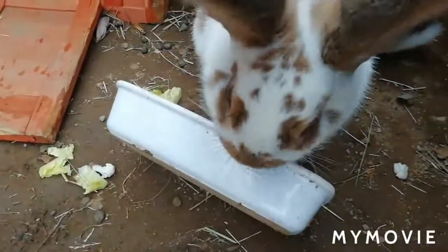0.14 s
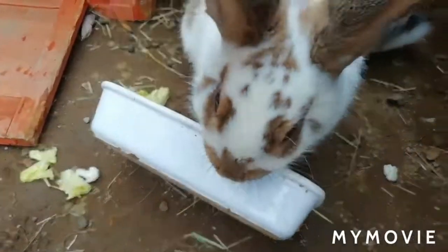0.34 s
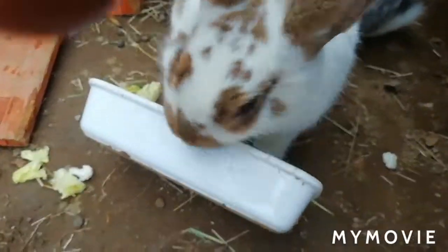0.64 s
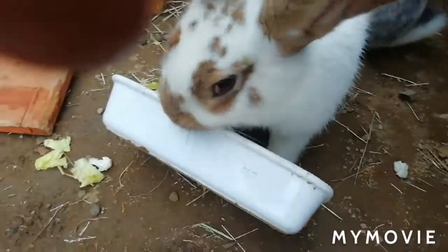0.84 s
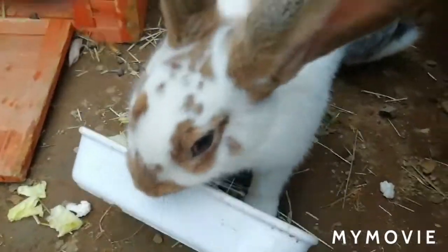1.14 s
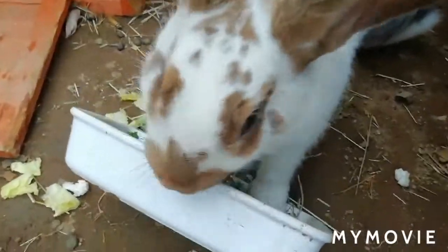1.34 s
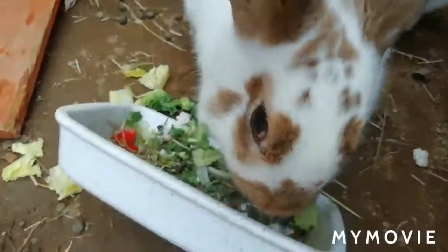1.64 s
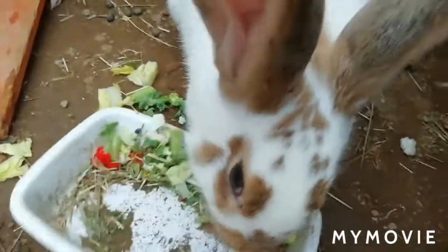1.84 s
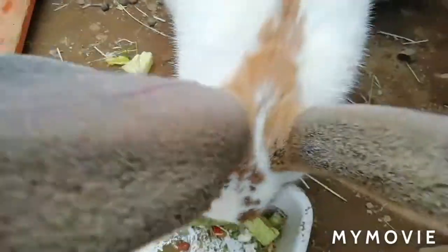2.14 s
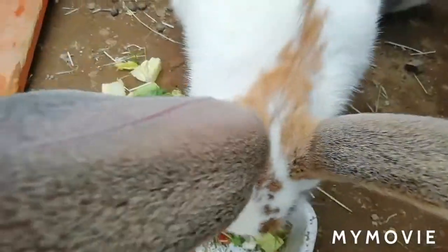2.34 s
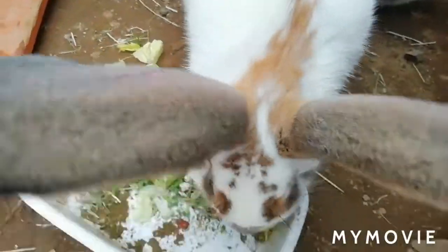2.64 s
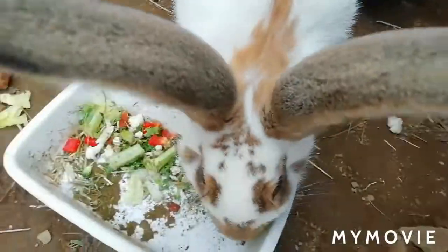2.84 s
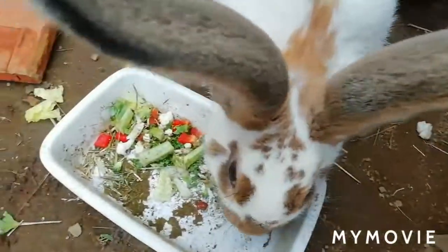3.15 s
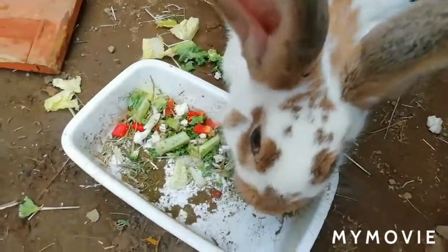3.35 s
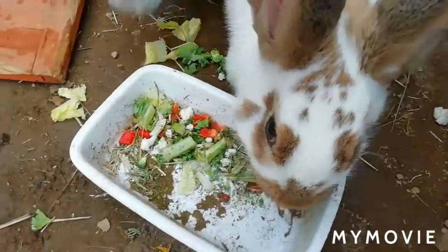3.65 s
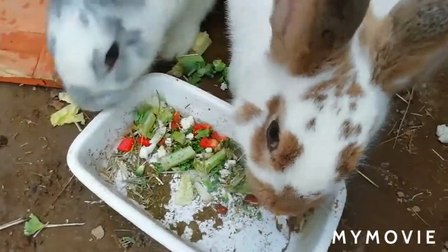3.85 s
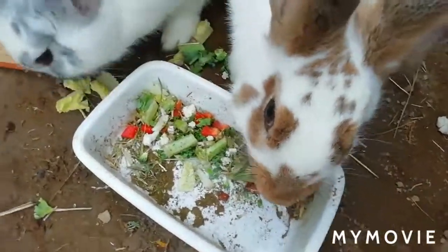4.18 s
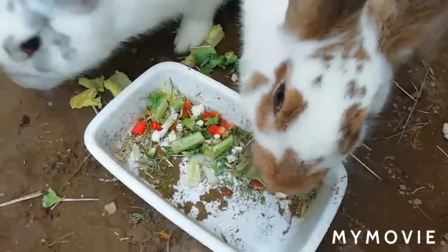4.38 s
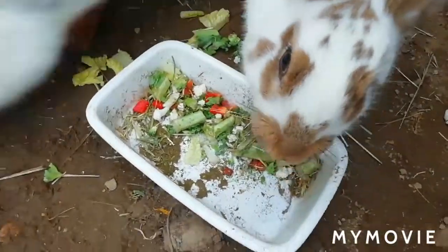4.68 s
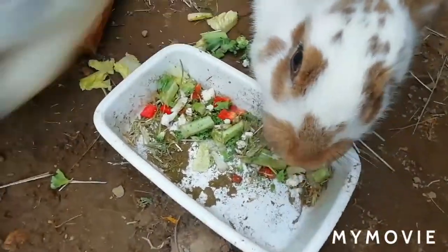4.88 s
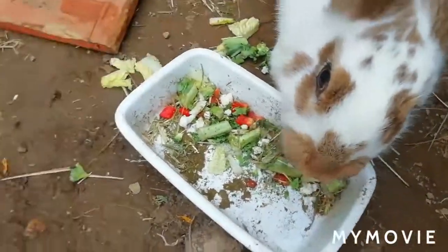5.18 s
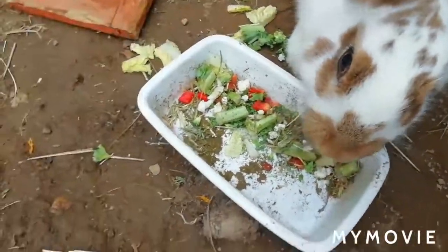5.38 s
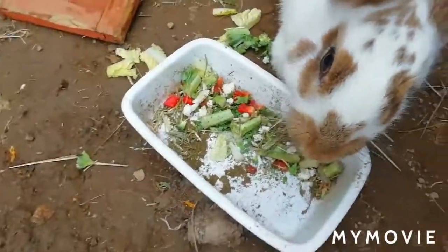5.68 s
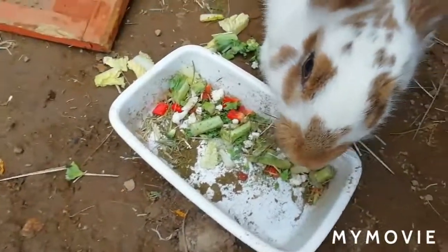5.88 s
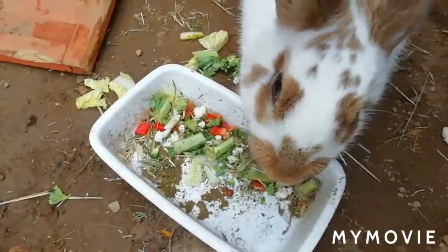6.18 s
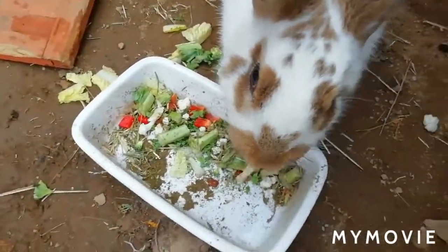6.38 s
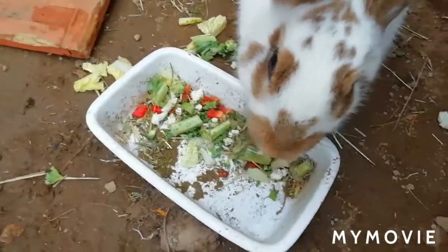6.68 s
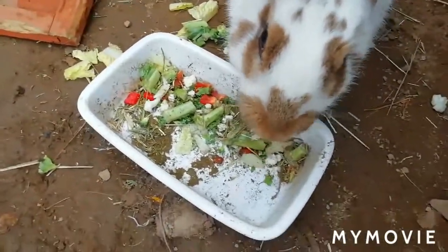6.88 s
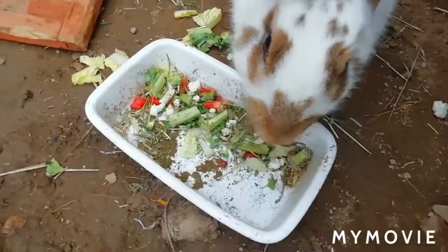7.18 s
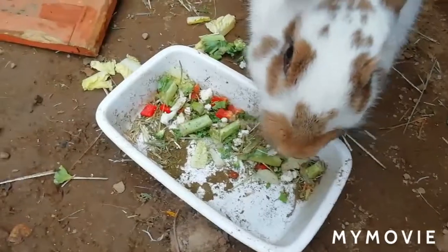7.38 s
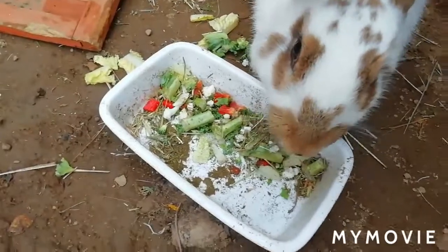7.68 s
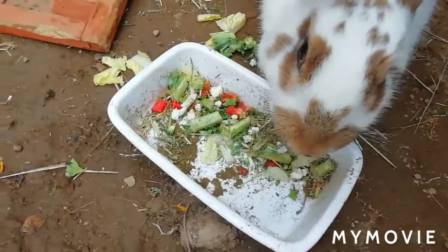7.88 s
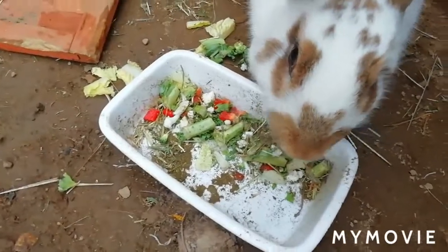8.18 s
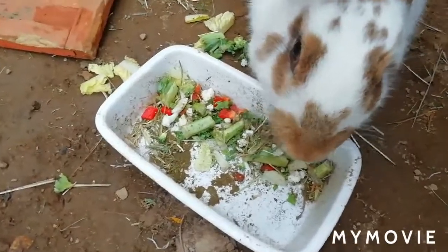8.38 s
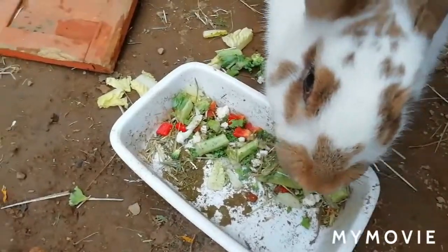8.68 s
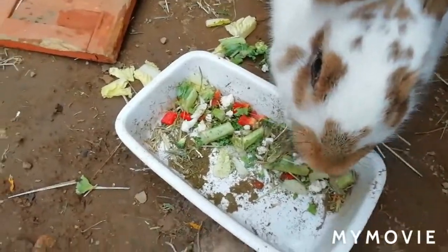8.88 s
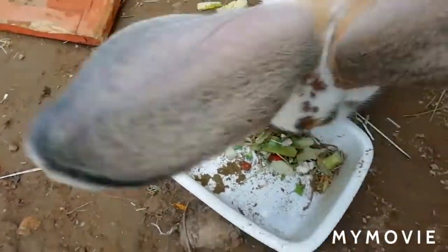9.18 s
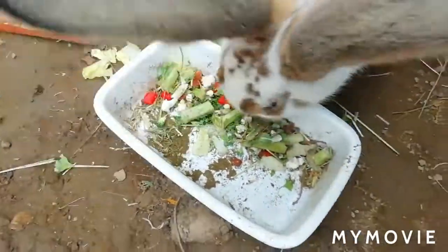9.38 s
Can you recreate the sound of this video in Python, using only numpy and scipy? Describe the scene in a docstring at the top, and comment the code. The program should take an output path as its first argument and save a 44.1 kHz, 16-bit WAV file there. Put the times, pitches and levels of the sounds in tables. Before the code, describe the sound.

A rabbit noses a ceramic dish, making a few light clinks among small crunches. At about two seconds the dish lands on soil with a soft double thud. The rabbit then eats vegetables and hay in short, crisp, irregular bursts, with sharp little snaps and a few soft knocks. The sounds are quiet and close, outdoors, with faint distant traffic and hiss behind them.

```python
"""Distant traffic and a faint hiss sound throughout. A rabbit noses a ceramic dish on bare soil, and its
touches excite the dish's modes in clinks. At two seconds the dish tips upright and lands with two thuds.
The rabbit eats from it: cells fracture in bursts of dense crunching, stalk and straw break in single
snaps, and jaw and dish knock softly. Near the end, faint fuzzy tones sound for a second."""
import sys
import numpy as np
from scipy import signal
from scipy.fft import rfft, irfft, next_fast_len
from scipy.io import wavfile
from scipy.ndimage import uniform_filter1d, map_coordinates

SR = 44100
rng = np.random.default_rng(int(sys.argv[2]) if len(sys.argv) > 2 else 0)


def generate_wav(sig):
    """Save sig (samples, or channels by samples) to the path in sys.argv[1] as 16-bit PCM at SR."""
    pcm = np.round(np.clip(np.atleast_2d(sig).T, -1, 1) * 32767).astype(np.int16)
    wavfile.write(sys.argv[1], SR, pcm)


N = 420273

# the head moves against ground and dish: time_s, notch_hz, hollow_db
HEAD_PATH = [(.6, 3970, 10), (2.37, 3910, 3), (3.42, 4030, 7), (4.16, 4060, -2), (4.75, 3990, 4.5),
             (5.16, 4000, -7), (5.4, 4060, 2.5), (7.23, 4050, 2.5), (7.68, 4000, 0), (8.6, 3900, -1.5),
             (8.98, 4040, -7), (9.43, 4100, -4)]


def amp(db):
    return 10 ** (np.asarray(db) / 20)


def unit(x):
    return x / np.sqrt(np.mean(x ** 2) + 1e-20)


def curves(rows):
    """Linear interpolation: one value per sample for each column after the time."""
    times, *columns = np.transpose(rows)
    return [np.interp(np.arange(N) / SR, times, column) for column in columns]


def wobble(rate_hz):
    """Smooth random modulation: a spline through Gaussian knots."""
    knots = rng.standard_normal(int(N * rate_hz / SR) + 4)
    return map_coordinates(knots, [np.arange(N) * rate_hz / SR])


def filtered(x, response):
    """Linear filtering: the spectrum times a frequency response."""
    size = next_fast_len(N + SR // 2)
    return irfft(rfft(x, size) * response(np.fft.rfftfreq(size, 1 / SR)), size)[:N]


def coloured(x, spectrum):
    """Spectral shaping on a log frequency axis, scaled to rms 1."""
    knots_hz, gain_db = np.transpose(spectrum)
    return unit(filtered(x, lambda hz: amp(np.interp(np.log(hz + 1), np.log(knots_hz + 1), gain_db))))


def patchy(x, depth_db):
    """Spectral modulation: random colour that changes every few hundredths of a second."""
    spectra = signal.stft(x, nperseg=256)[2]
    field = uniform_filter1d(rng.standard_normal(spectra.shape), size=5, axis=0)
    field = uniform_filter1d(field, size=6, axis=1)
    return signal.istft(spectra * amp(depth_db * unit(field)), nperseg=256)[1][:N]


def damped(t, level_db, pitch_hz, t60_s):
    """Free vibration of one mode: a sine that decays exponentially."""
    return amp(level_db - 60 * t / t60_s) * np.sin(2 * np.pi * pitch_hz * t)


def add(out, start_s, sound):
    """Superposition: mix a sound in at its start time."""
    part = out[round(start_s * SR):][:len(sound)]
    part += sound[:len(part)]


def traffic():
    """Broadband noise from afar: a wavering rumble and a tyre roar that thins out into hiss."""
    # slow trend of the traffic: time_s, rumble_db, roar_db
    trend = [(0.0, -66.5, -70), (4.67, -65.5, -68.5), (5.23, -63, -64.5), (5.86, -68, -68.5),
             (9.53, -63, -68.5)]
    # relative spectra: frequency_hz, density_db
    rumble_spectrum = [(8.8, -41), (15, 3), (22, -11.5), (48, 3), (119, -4.5), (157, -1.5), (396, -17),
                       (469, -19.5), (600, -22), (780, -19), (1320, -120)]
    roar_spectrum = [(240, -63), (400, -13), (616, -12), (979, 3), (2590, -13.5), (3120, -9.5), (5870, -18),
                     (8500, -13.5), (10200, -24), (15000, -23.5), (16000, -36)]
    rumble_db, roar_db = curves(trend)
    rumble = amp(rumble_db + 1.5 + 0.61 * wobble(5)) * coloured(rng.standard_normal(N), rumble_spectrum)
    roar_gain = amp(roar_db - 2.0 + 1.84 * wobble(2.392))
    return rumble + roar_gain * coloured(patchy(rng.standard_normal(N), depth_db=2.3), roar_spectrum)


def fuzzy_tones():
    """Narrow-band noise: three resonances give faint, flickering pitches."""
    # resonances: centre_hz, width_hz, gain_db
    bands = [(3250, 45, 0), (5800, 80, -5), (8750, 100, -1)]
    # envelope: time_s, level_db
    swell = [(8.42, -110), (8.46, -70), (8.8, -73), (9.27, -79), (9.33, -110)]

    def response(hz):
        return sum(amp(db) * 1j * hz * width / (centre ** 2 - hz ** 2 + 1j * hz * width)
                   for centre, width, db in bands)
    return amp(curves(swell)[0] + 2.2 * wobble(24)) * unit(filtered(rng.standard_normal(N), response))


def yard_echoes(x):
    """Reverberation: ground and boards scatter a short, decaying tail."""
    t = np.arange(SR // 4) / SR
    tail = rng.standard_normal(len(t)) * amp(-60 * t / 0.16) * (t > .002)
    return signal.fftconvolve(x, tail / np.linalg.norm(tail))[:N]


def ground_bounce(x, reflection=.7):
    """Comb filtering: a reflection half a period late weakens the notch pitch and its odd multiples."""
    notch_hz = curves(HEAD_PATH)[0]
    return x + reflection * map_coordinates(x, [np.arange(N) - SR / (2 * notch_hz)])


def dish_clinks():
    """Modal ringing: the point struck sets each family's strength; soil and food damp the ring."""
    # mode families (floor, rim, long walls, short walls, edges), each mode: pitch_hz, gain_db, t60_s
    families = [
        [(656, 1, 0.18)],
        [(1383, 0, 0.14), (1510, 1.5, 0.014)],
        [(2093, 5, 0.11), (3160, -7.5, 0.12)],
        [(2330, -2.5, 0.16), (2420, -4, 0.077), (3385, 0, .11), (4770, -3, 0.083), (4940, -9, 0.059)],
        [(4530, -14, 0.053), (6400, -13, 0.049), (6700, 3.5, 0.034), (8280, -4, 0.057), (8360, 7.5, 0.058),
         (9360, 7.5, 0.044), (11400, -11, 0.031)],
    ]
    # blows: start_s, floor_db, rim_db, long_walls_db, short_walls_db, edges_db, t60_ratio, attack_s
    blows = [(0.4391, -88, -42, -65, -55, -51.5, 0.49, 0.00066),
             (.829, -93, -61.5, -68.5, -80, -74, 1.9, 0.0043),
             (.933, -92, -85, -85, -70, -69.5, 0.9, 0.0024),
             (1.1091, -78, -44, -38, -37, -46, 0.51, 0.00073),
             (1.2515, -76, -70, -73, -73, -61, 0.61, 0.0014),
             (1.3001, -88, -37, -46, -64, -50, 0.34, 0.00043),
             (1.967, -82, -77, -63, -55.5, -53, 1, 0.00035),
             (2.0005, -48, -76, -61.5, -63, -63, 2.3, 0.00042)]
    out, t = np.zeros(N), np.arange(SR // 2) / SR
    clack = 1 + 1.2 * amp(-60 * t / 0.027)  # the first swing is strong while the contact lasts
    for start_s, *family_db, t60_ratio, attack_s in blows:
        for blow_db, modes in zip(family_db, families):
            ring = sum(damped(t, blow_db + db + rng.normal(0, 1.5), hz, t60_s * t60_ratio)
                       for hz, db, t60_s in modes)
            add(out, start_s, ring * clack * (1 - np.exp(-t / attack_s)))
    return out


def thuds_and_knocks():
    """Damped impacts: the landing dish excites low modes; soft knocks die within 14 cycles."""
    # the dish lands: start_s, level_db
    landings = [(1.969, -49.5), (2.001, -37.5)]
    # modes of the dish on soil: pitch_hz, gain_db, t60_s
    soil_modes = [(81, -1, 0.29), (127.3, -14.5, 0.51), (204, -6.5, 0.18), (282, 1, 0.045),
                  (1070, 1.5, 0.016)]
    # knocks of jaw and dish: start_s, relative_db, pitch_hz
    knocks = [(2.645, -56, 3300), (3.338, -61, 1160), (3.682, -50, 1330), (4.988, -51, 1090),
              (5.417, -47, 1060), (5.608, -59, 1030), (5.778, -58, 1020), (6.195, -48, 1600),
              (6.251, -49, 1820)]
    out, t = np.zeros(N), np.arange(SR // 2) / SR
    for start_s, level_db in landings:
        add(out, start_s, sum(damped(t, level_db + db, hz, t60_s) for hz, db, t60_s in soil_modes))
    for start_s, db, hz in knocks:
        add(out, start_s, damped(t, db + 6.5, hz, t60_s=14 / hz))
    return out


def chewing_levels():
    """Incoherent sources add in power: bites plus rustle, in dB for crisp, middle and coarse grains."""
    # bites and rummages; offsets are from crisp_db, rise and fall each span 20 dB:
    # peak_s, hold_s, crisp_db, middle_offset_db, coarse_offset_db, rise_s, fall_s
    bites = [(0.444, .002, -51, -21, 1.5, 0.011, .017), (.567, 0.017, -48.5, -4, -8.5, .012, 0.06),
             (1.058, .03, -60, 8.5, -3.5, .065, .03), (1.067, .002, -36, -11, -31, 0.0099, 0.011),
             (1.117, .002, -51, 6.5, -2, 0.043, .025), (1.256, .003, -53.5, 2.5, -1.5, 0.013, 0.026),
             (1.305, .003, -57, 4.5, 0, 0.043, 0.075), (1.401, 0.009, -64.5, -1, -4, 0.18, 0.14),
             (1.973, 0.0018, -47.5, 10.5, -17, 0.015, 0.0092), (2.005, 0.0035, -54, -5, -4.5, 0.046, 0.086),
             (2.332, 0.075, -36.5, 1.5, -4, 0.023, 0.017), (2.45, 0.026, -63, 1.5, -7, .03, 0.09),
             (2.715, 0.037, -51, 1, -10.5, 0.019, 0.023), (2.85, 0.12, -70, -3, -4, 0.11, .1),
             (3.0, 0.041, -61, -1.5, -0.5, 0.093, 0.034), (3.193, .003, -68, -5, -9, 0.09, 0.046),
             (3.358, .003, -51, -8, -17, .028, .045), (3.4, 0.057, -61.5, 5.5, -14, 0.036, 0.05),
             (3.568, .003, -65, 3, -3.5, 0.098, 0.15), (3.684, .003, -61.5, 4.5, -3.5, 0.11, 0.11),
             (3.753, 0.049, -61, 1.5, -13, 0.045, 0.18), (3.965, 0.0092, -61, 3, -10, 0.023, .028),
             (4.157, 0.0088, -54, 0, -1.5, 0.032, 0.095), (4.33, .015, -59, -3.5, -5.5, .025, .08),
             (4.36, 0.11, -63, -2, -5.5, .05, .04), (4.548, 0.021, -44.5, -8.5, -41, .021, 0.02),
             (4.739, 0.026, -41.5, -3.5, -9, 0.061, 0.02), (4.807, 0.0027, -54, -17, -4, .1, 0.016),
             (4.989, 0.071, -61, -3, -8, 0.25, 0.25), (5.157, .003, -42.5, 0, -1.5, 0.057, 0.055),
             (5.329, .006, -39.5, -4, -8.5, 0.027, 0.063), (5.39, 0.05, -60, 0.5, -4, .05, 0.035),
             (5.573, 0.026, -63, -4, -9.5, 0.16, 0.21), (5.69, 0.13, -70.5, -14, -20, .03, 0.06),
             (6.0, .003, -61.5, -7, -6.5, 0.095, 0.063), (6.451, 0.0028, -60.5, -1.5, -7, 0.048, 0.039),
             (6.5, .12, -72, -3, 0, .1, .08), (6.8, .3, -72.5, 1, -10, .06, .1),
             (7.166, .002, -42, -1, -3.5, 0.028, .045), (7.218, 0.067, -34.5, -3.5, -3, 0.056, 0.015),
             (7.46, 0.03, -80, 4, -2, 0.072, .05), (7.658, 0.039, -47, -4, -4.5, 0.022, 0.029),
             (7.85, 0.028, -74.5, 2, -1, 0.036, .04), (8.04, 0.044, -76, 1, -3, .05, .04),
             (8.165, 0.0093, -69, -15, -14, .02, 0.031), (8.29, .01, -74, 5, -1, .03, 0.033),
             (8.419, .002, -60.5, -9, -0.5, 0.012, 0.012), (8.599, .052, -35.5, -1, -6, 0.067, 0.039),
             (8.884, .002, -50.5, -0.5, -12, 0.051, 0.06), (8.945, 0.079, -44.5, 1.5, -5.5, 0.083, 0.061),
             (9.323, .005, -59, -13, -22, 0.023, 0.17), (9.432, 0.023, -36, -8, -1, 0.056, 0.013)]
    # fur and straw between bites: time_s, crisp_db
    rustle = [(0, -79), (.5, -71), (.75, -78.5), (.9, -75), (1.2, -86), (1.5, -77.5), (2.0, -72.5),
              (2.65, -76), (3.1, -78), (3.9, -75), (4.51, -73), (4.62, -66), (5.25, -69), (5.5, -77.5),
              (6.2, -76.5), (6.72, -89), (7.3, -76), (7.7, -89), (8.4, -79), (8.75, -71), (9.2, -78),
              (9.53, -90)]
    t = np.arange(0, N, 32) / SR
    peak_s, hold_s, crisp_db, middle, coarse, rise_s, fall_s = np.transpose(bites)[:, :, None]
    drop_db = 20 * (np.maximum(peak_s - t, 0) / rise_s + np.maximum(t - peak_s - hold_s, 0) / fall_s)
    rustle_db = np.interp(t, *np.transpose(rustle))
    levels_db = []
    for bite_offset, rustle_offset in [(0, 0), (middle, -0.1), (coarse, -4)]:
        power = amp(2 * (crisp_db - drop_db + bite_offset)).sum(0) + amp(2 * (rustle_db + rustle_offset))
        levels_db.append(np.interp(np.arange(N) / SR, t, 10 * np.log10(power)))
    return levels_db


def snaps(crisp_db, small_count=170):
    """Brittle fracture: a crack of a few milliseconds, its fibres ringing at random around a centre."""
    # the clearest breaks of stalk and straw: time_s, peak_db, centre_hz
    breaks = [(0.4856, -44, 2250), (0.493, -37.5, 2070), (0.5082, -42, 1500), (0.5696, -39, 8000),
              (0.6182, -42, 7600), (0.8664, -43.5, 3240), (1.0582, -34, 8030), (1.0639, -25, 8450),
              (1.066, -40, 7900), (1.0718, -41, 7840), (1.0949, -33, 6500), (1.2224, -43.5, 8360),
              (1.2838, -45, 7500), (1.3723, -48, 6200), (1.3933, -36, 4570), (1.4048, -25.5, 5400),
              (1.8077, -47, 3400), (1.9148, -42.5, 2960), (2.222, -52.5, 8000), (2.3289, -29, 6100),
              (2.355, -24, 5500), (2.406, -19, 8500), (2.4101, -27, 8100), (2.4345, -37, 7200),
              (2.7235, -44, 6700), (2.8673, -49.5, 7800), (2.9175, -49, 7900), (2.9412, -45, 4100),
              (3.17, -47, 1900), (3.3067, -45, 7440), (3.3487, -39, 7200), (3.532, -47, 6030),
              (3.5617, -46, 5400), (3.598, -48, 6960), (3.6828, -41.5, 1880), (3.7522, -41, 7500),
              (3.7576, -39, 6560), (3.777, -38, 7000), (3.793, -39.5, 7550), (3.9564, -31, 5630),
              (3.9688, -47, 6600), (4.1592, -36, 8100), (4.236, -43, 3540), (4.3778, -46, 6200),
              (4.3944, -47, 8200), (4.4116, -43, 5570), (4.4372, -34, 3960), (4.469, -46.5, 8400),
              (4.5324, -37, 8300), (4.5371, -40, 7260), (4.5474, -49, 8400), (4.5679, -33.5, 8200),
              (4.595, -43, 8350), (4.608, -43, 8340), (4.6867, -46, 7400), (4.7266, -39, 7900),
              (4.7341, -25, 7300), (4.7986, -43, 5600), (4.8857, -46, 6500), (4.9777, -44, 7800),
              (4.9893, -41, 4500), (5.1255, -35, 8600), (5.16, -33, 5800), (5.1921, -32, 3540),
              (5.327, -34, 9000), (5.3296, -23.5, 9000), (5.3353, -40, 8000), (5.3503, -32, 7600),
              (5.3888, -31.5, 8600), (5.4158, -36, 5230), (5.4335, -41, 7400), (5.5156, -41.5, 3730),
              (5.5313, -42.5, 4080), (5.6195, -44.5, 6740), (5.895, -50, 3200), (5.995, -45, 8200),
              (6.0281, -49, 8300), (6.1966, -36, 1740), (6.2537, -44, 2420), (6.938, -44, 5240),
              (7.0402, -50, 6400), (7.114, -40.5, 6400), (7.1415, -33, 8100), (7.1922, -21, 8550),
              (7.2671, -18.5, 8100), (8.42, -49, 6150), (8.5221, -44, 7800), (8.5828, -19, 7600),
              (8.8478, -39, 6850), (8.8643, -39, 6900), (8.877, -40, 6800), (8.8883, -29.5, 6900),
              (8.9305, -35, 6900), (9.0071, -31.5, 5800), (9.2086, -50, 6100), (9.231, -51, 2000),
              (9.3135, -45, 7900), (9.325, -49, 8300), (9.3832, -32, 8300)]
    out, t, hz = np.zeros(N), np.arange(512) / SR, np.fft.rfftfreq(512, 1 / SR) + 1
    age_s = np.maximum(t - .002, 0)
    moment, size, pitch = rng.random((small_count, 3)).T
    # small snaps grow with the crunch, up to a limit
    small_db = np.minimum(crisp_db[(moment * N).astype(int)], -52) + 10 - 3 * np.log(size + .02)
    small_breaks = zip(moment * N / SR + .003, small_db, 4500 + 4000 * pitch)
    for time_s, peak_db, centre_hz in [*breaks, *small_breaks]:
        decay = amp(-60 * age_s / 0.003) + 0.25 * amp(-60 * age_s / 0.024)
        burst = rng.standard_normal(512) * decay * (age_s > 0)
        colour = amp(-17 * np.log2(hz / centre_hz) ** 2) + amp(-14 - 1.27 * np.log2(hz / 6000) ** 2)
        crack = irfft(rfft(burst) * colour * amp(-9 * (hz > 10500)))
        add(out, time_s - .0024, amp(peak_db) * crack / np.abs(crack).max())
    return out


def grains(per_s, spread_db):
    """Shot noise: tiny fractures at random moments, a few much larger than the rest."""
    chance, polarity, size = rng.random((3, N))
    return unit((chance < per_s / SR) * np.sign(polarity - .5) * amp(-spread_db * np.log(size + .005)))


def crunch(crisp_db, middle_db, coarse_db):
    """Acoustic emission: cells burst in clumps under the teeth, three grain sizes on a bed of noise."""
    # relative spectra of the grains: frequency_hz, density_db
    crisp_spectrum = [(4000, -41.5), (6000, -16), (7400, -8), (8800, -2), (9700, -9.5), (11200, -7.5),
                      (13000, -12.5), (15000, -40), (16000, -7.5)]
    middle_spectrum = [(2200, -30), (3600, 3), (5000, -0.5), (6500, -7.5), (7600, -11), (10000, -37),
                       (16000, -43)]
    coarse_spectrum = [(400, -41), (800, -23), (1300, -12.5), (2050, -4.5), (2700, -3), (3300, -2.5),
                       (4100, -2.5), (6000, -27), (9000, -70)]
    clumps = amp(1.8 * wobble(90) + 1.94 * wobble(300))
    sparseness = np.clip((-30 - crisp_db) / 25, .3, 1)  # strong bites fuse their grains into a rush

    def layer(graininess, spectrum):
        fractures = graininess * sparseness * grains(2500, spread_db=5) + rng.standard_normal(N)
        return coloured(patchy(clumps * fractures, depth_db=2.5), spectrum)
    coarse = layer(0.53, coarse_spectrum)
    lows = filtered(coarse, lambda hz: 1 / (1 + (hz / 1550) ** 8))
    hollow_db = curves(HEAD_PATH)[1]
    coarse += (amp(hollow_db) - 1) * lows  # the dish deepens bites made inside it
    crisp = layer(0.75, crisp_spectrum)
    middle = layer(0.5, middle_spectrum)
    return amp(crisp_db) * crisp + amp(middle_db) * middle + amp(coarse_db) * coarse


def scene():
    """Superposition of rabbit and dish, their echoes and the background."""
    crisp_db, middle_db, coarse_db = chewing_levels()
    eating = crunch(crisp_db, middle_db, coarse_db) + snaps(crisp_db)
    near = ground_bounce(eating) + dish_clinks() + thuds_and_knocks()
    return (near + amp(-14.0) * yard_echoes(near) + fuzzy_tones() + traffic())[None]


def record(dry):
    """Band limiting: the phone keeps nothing above its cutoff."""
    return filtered(dry[0], lambda hz: hz < 15750)[None]


dry = scene()
out = record(dry)
generate_wav(out)
```